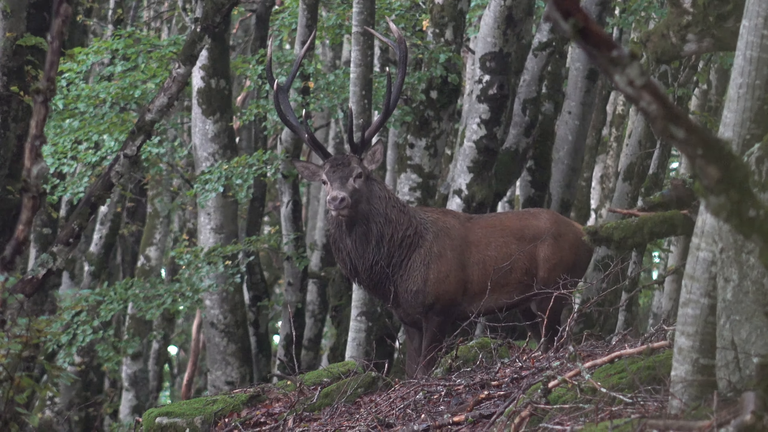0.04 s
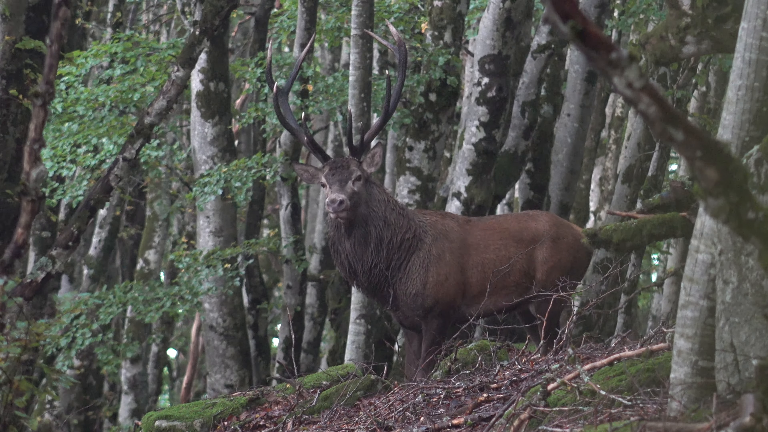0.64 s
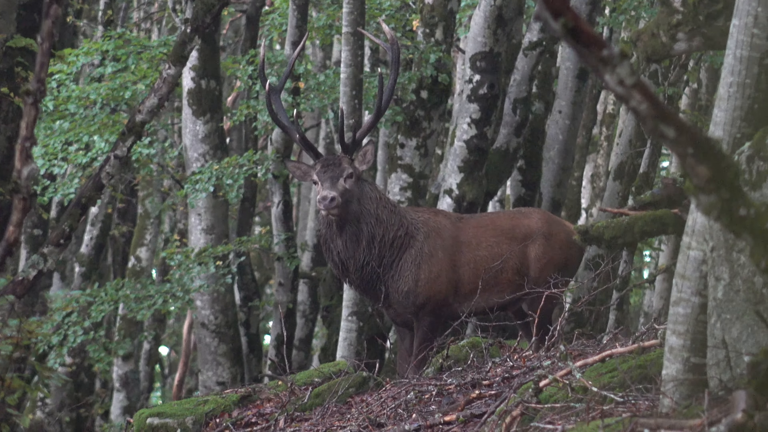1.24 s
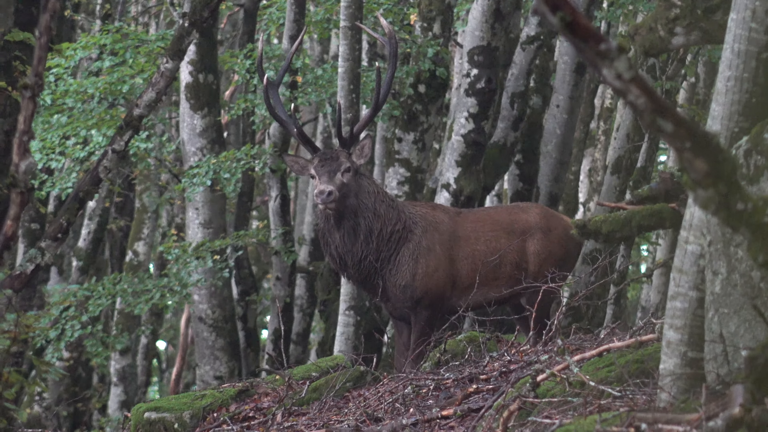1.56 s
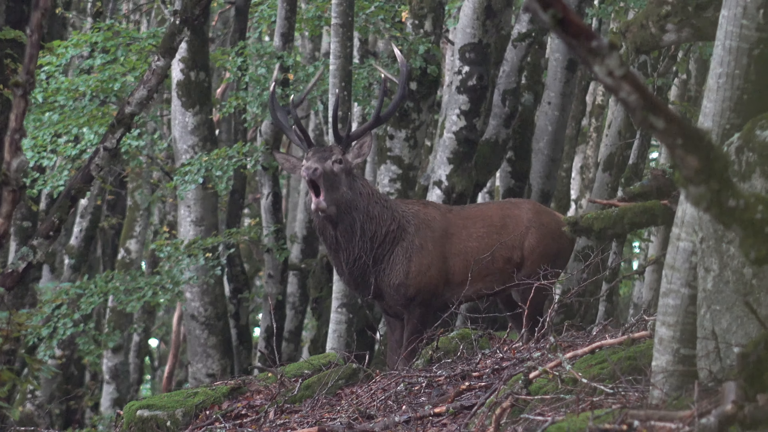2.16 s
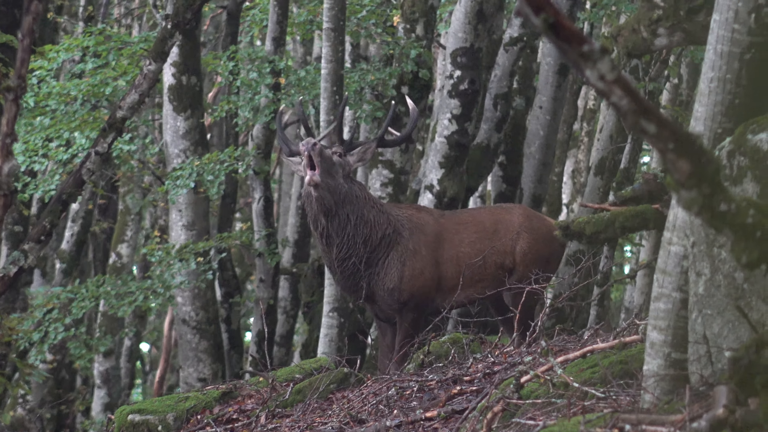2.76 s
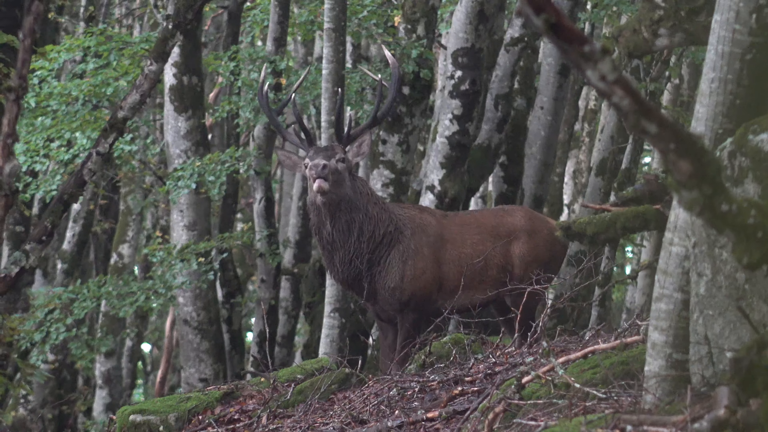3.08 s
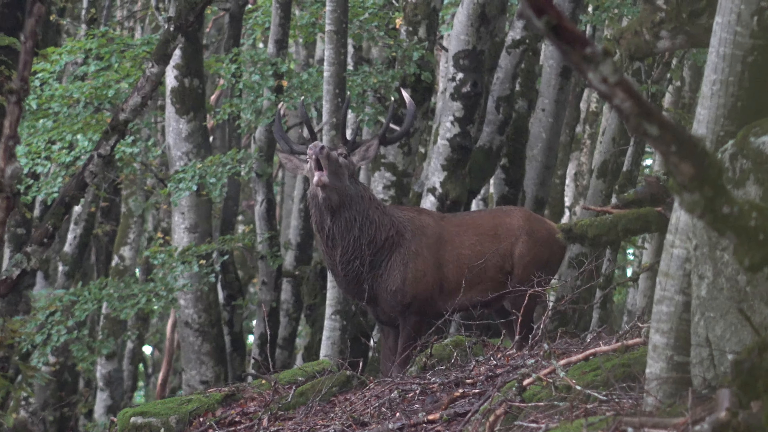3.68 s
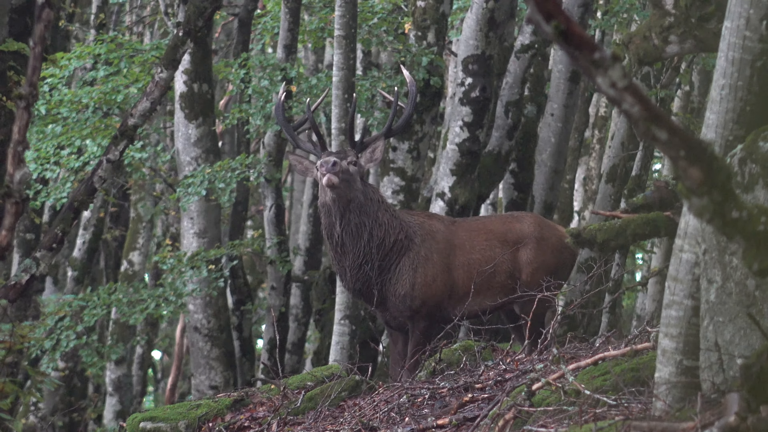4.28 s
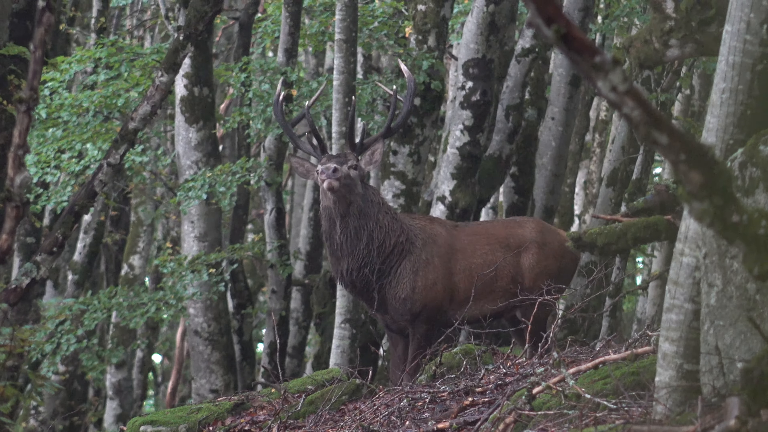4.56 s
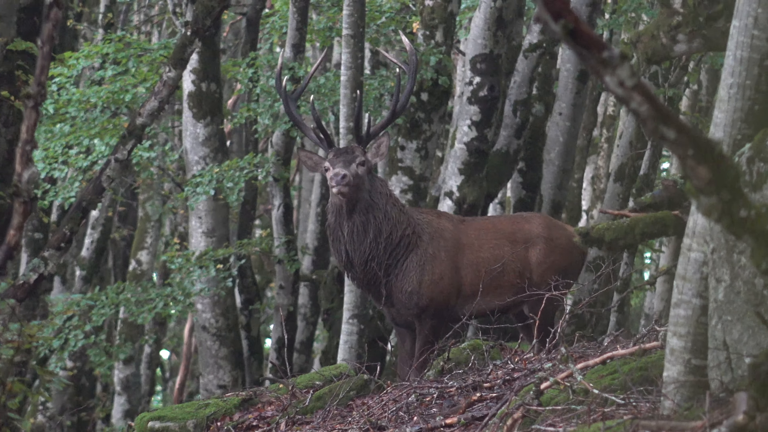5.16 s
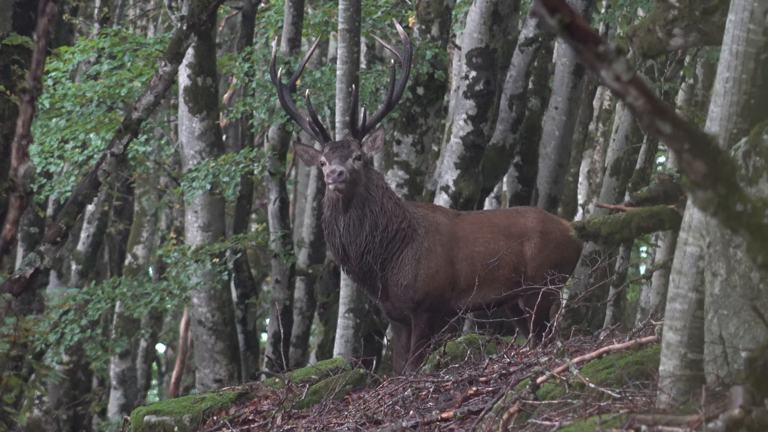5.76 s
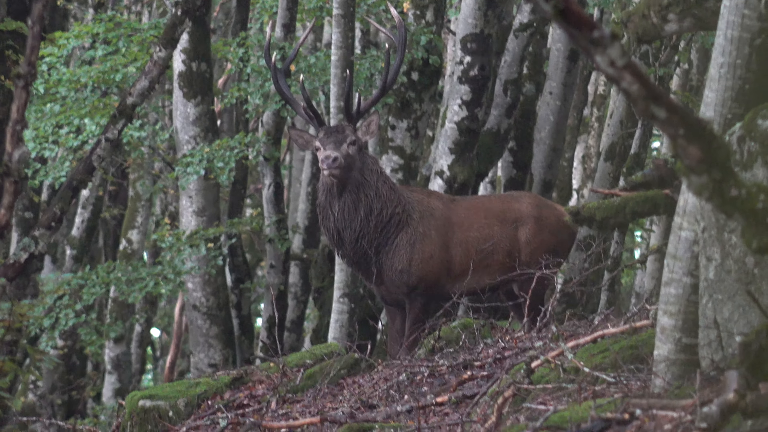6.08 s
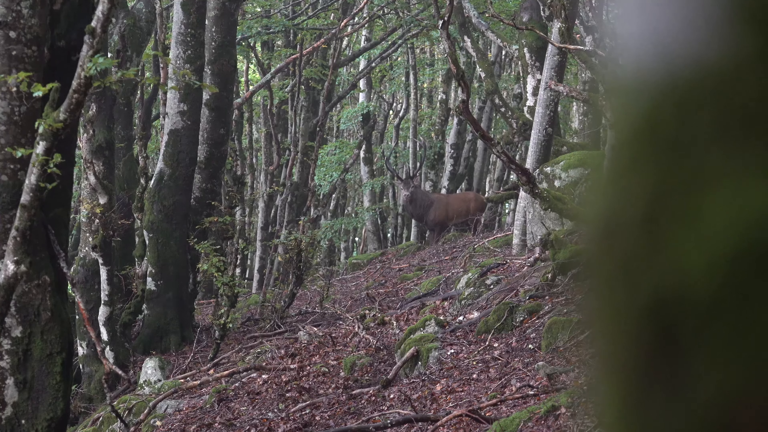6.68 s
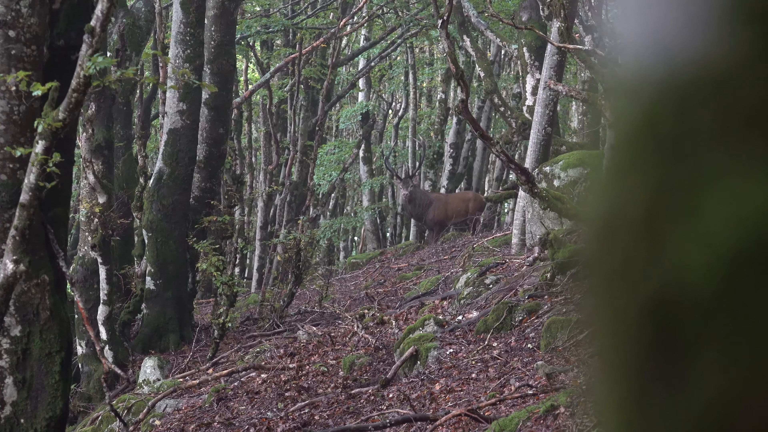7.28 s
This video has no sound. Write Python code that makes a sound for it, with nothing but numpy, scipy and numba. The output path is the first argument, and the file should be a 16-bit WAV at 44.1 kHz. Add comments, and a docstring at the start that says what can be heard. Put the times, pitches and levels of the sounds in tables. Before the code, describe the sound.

In quiet woods, twigs tick over a low rumble while a stag bellows hoarsely three times, once long and twice briefly, echoing among trunks.

```python
"""In a beech wood, a red deer stag gives one long harsh roar and two short ones.
The voice is a source and a filter: uneven glottal pulses excite the resonances of his long throat.
In each roar the pitch scoops up, sags and collapses while the larynx sinks, stretching the throat,
and springs back; the trunks scatter the sound. Far stags call faintly, twigs tick, and the microphone
sways on its mount over a low rumble."""
import sys
import numpy as np
from scipy import signal
from scipy.fft import rfft, irfft, next_fast_len
from scipy.io import wavfile
from scipy.ndimage import uniform_filter1d, minimum_filter1d
from numba import njit

SR = 44100
rng = np.random.default_rng(int(sys.argv[2]) if len(sys.argv) > 2 else 0)


def master(y):
    """Save y as 16-bit WAV."""
    cut = np.clip(np.atleast_2d(y).T, -1, 1)
    pcm = np.round(cut * 32767)  # scale
    wavfile.write(sys.argv[1], SR, pcm.astype(np.int16))


N = 327663
T = np.arange(N) / SR

# Roars: (start [s], end [s], pitch [Hz], level [dB], swell [s], fade [dB], chest offset [dB],
# rasp offset [dB], first larynx height [0 = at the chest, 1 = at rest], lowest height [same scale],
# time spent sinking [share])
STAG_ROARS = [(2.253, 3.019, 165.3, -16, 0.035, 27.5, -3.5, -9.5, 1.11, 0.028, 0.779),
              (3.416, 3.723, 167.7, -17.5, 0.12, 19.5, -5, -6.5, 0.73, 0.27, 0.71),
              (3.903, 4.101, 164.3, -19.5, 0.065, 15.5, -5.5, -8, 0.71, 0.245, 0.59)]
# Low, middle and high resonances of the throat: (frequency [Hz], bandwidth [Hz], level [dB],
# frequency shift at larynx height 1 [share], level change at larynx height 1 [dB])
CHEST_MODES = [(151.6, 215, -7.5, 0, -1), (324, 90, 3, 0, -7), (394.5, 39.5, -7, 0.1, 13.5)]
MOUTH_MODES = [(772, 50, 0, .19, 4.5), (833, 69, -19, 0.13, 17.5), (1099, 97, 2, 0.1, 1),
               (1240, 57, -7.5, 0.18, 0), (1550, 42, 9.5, 0.062, -3), (1783, 74, 3.5, 0.023, 1.5),
               (2060, 96, -20, 0.021, 11.5), (2304, 163, -10, 0.043, 3), (2666, 113, -9, 0.016, 8.5)]
RASP_MODES = [(2990, 110, 0, -0.0041, -4.5), (3450, 190, 1.5, -0.033, -13.5), (3640, 108, -10, 0.053, 11),
              (3834, 84, -3.5, -0.0013, 10.5), (4130, 110, 0.5, 0.0072, -2),
              (4650, 180, -16.5, -0.027, 8.5), (4876, 305, -12, 0.013, -9), (5090, 600, -21.5, -0.027, 6),
              (5830, 260, -23, 0.012, 1.5), (7300, 1100, -36.5, -0.022, 2), (8700, 700, -39.5, -0.0051, -8)]
# Resonances of the short throat, a far stag's throat and an earlier call's echo: columns as above
FLAP_MODES = [(1210, 280, -7.5, 0, 0), (1610, 330, 2.5, 0, 0), (2390, 270, -1, 0, 0),
              (3180, 440, -10, 0, 0)]
FAR_MODES = [(345, 120, 2, 0, 0), (443, 34, -9, 0, 0), (976, 150, 5, 0, 0), (1250, 150, -15, 0, 0),
             (1900, 710, -4.5, 0, 0)]
ECHO_MODES = [(700.6, 11, -1.5, 0, 0), (820, 190, -12.5, 0, 0), (1194, 120, -4.5, 0, 0),
              (1205, 96, -2, 0, 0), (1853, 130, -25, 0, 0)]
# Brief flares of the rasp: (time [s], boost [dB])
RASP_FLARES = [(2.703, 8), (3.448, 5)]
# Spectrum that the wood sends back: (frequency [Hz], level [dB])
ECHO_SPECTRUM = [(100, -2), (300, 3), (400, 10.5), (600, 7.5), (800, 2), (1600, -5.5), (3000, -4),
                 (6000, 1), (15000, -4.5)]
# Distant calls: (start [s], end [s], pitch [Hz], level [dB])
FAR_CALLS = [(6.761, 7.258, 182.4, -54.5), (7.25, 7.9, 170.5, -45.5)]
# Twigs and falling bits of beech: (time [s], level [dB], ring [Hz], crack offset [dB], snap offset [dB])
TWIG_TICKS = [(0.2423, -33.5, 2260, -6, -6), (0.3758, -33, 2300, 0, -2), (0.7697, -33, 3970, -9, -23),
              (0.9744, -22, 3730, -26, -5), (1.277, -36, 2000, -11, -2), (1.5997, -21, 1530, -31, -11),
              (2.0668, -33.5, 2330, -6, -6), (2.496, -27, 4030, -12, -9), (2.676, -23, 3960, -8, -11),
              (3.0353, -29, 4050, -12, -5), (3.187, -33.5, 1790, -15, -2.5), (3.7671, -28, 4220, -14, -5.5),
              (4.7367, -36, 4270, -20, 7.5), (4.893, -37.5, 2400, -3, -18), (5.9966, -15, 2410, -16.5, -42),
              (6.4568, -20, 1560, -15, -17), (6.857, -18, 1650, -25, -12.5), (6.8983, -31, 1990, -11, -16)]
# Dull knocks and soft thumps: (time [s], frequency [Hz], level [dB], time to fall 60 dB [s])
DULL_KNOCKS = [(1.36, 120, -30, .17), (3.19, 110, -32, .17), (6.0, 55, -13, .13), (5.997, 790, -33, .09),
               (5.997, 930, -30, .08)]
# Bands of the patter in the leaves: (frequency [Hz], bandwidth [Hz], level offset [dB])
LEAF_BANDS = [(2630, 1500, 0.5), (4270, 2800, 1), (8000, 4500, -8.0)]
# Spectra of the still air and of the rumble: (frequency [Hz], relative density [dB])
AIR_SPECTRUM = [(41, -41), (70, 0), (117, -4.5), (179, -4.5), (350, -5.5), (432, -9.5), (591, -15),
                (954, -15), (1990, -23), (2480, -21), (3390, -26), (4080, -22.5), (5680, -30),
                (7380, -33.5), (10000, -36), (15500, -37)]
RUMBLE_SPECTRUM = [(17, -2), (24, -2), (34, 0), (45, -8), (62, -17), (90, -32), (160, -55)]
# Slow rise and fall of the background: (time [s], level [dB])
BACKGROUND_LEVELS = [(0.0, -27), (0.8, -28.5), (1.4, -25.5), (2.6, -33.5), (3.3, -28), (4.45, -31),
                     (4.75, -33.5), (6.55, -27), (6.9, -32), (7.3, -24.0)]


def stag(swell_db=9, chest_swell_db=10.5, growl_db=5.5, push_s=.07, flare_s=.012,
         open_s=.016, close_s=.011):
    """Phonation: a roar swells, clears and brightens as the larynx sinks, and breaks up on slack folds."""
    out = np.zeros(N)
    for start, end, top_hz, db, swell_s, fade_db, chest_offset, rasp_offset, *descent in STAG_ROARS:
        span = slice(int(start * SR), int(end * SR))
        t = T[span]
        age = t - t[0]
        hz, slack = vocal_folds(t, start, end, top_hz)
        larynx = larynx_height(age / age[-1], *descent)
        stretch = np.exp(-(larynx / .14) ** 4)  # near 1 at full stretch: brighter, with thinner bass
        push = np.exp(-age / push_s)  # the first push of air
        rough = np.clip(.21 + .33 * larynx + .4 * push + .35 * slack - .13 * stretch, 0, 1)
        weak = np.maximum(1 - (age / swell_s) ** 2, 0)
        faded_db = fade_db * slack ** 1.55
        effort_db = db - swell_db * weak - faded_db
        flare_db = sum(boost * np.exp(-((t - s) / flare_s) ** 2) for s, boost in RASP_FLARES)
        mouth_db = effort_db + 2.5 * larynx + 3.5 * stretch
        rasp_db = effort_db + rasp_offset - 4 * larynx + 1.5 * stretch + flare_db
        bass_db = db - chest_swell_db * weak + growl_db * slack
        chest_db = bass_db + chest_offset - 5 - .28 * faded_db - 3.5 * larynx - 12.5 * stretch
        edges = np.clip(np.minimum((age / open_s) ** 2, (age[-1] - age) / close_s), 0, 1)
        out[span] = edges * voice(hz, rough, larynx, mouth_db, chest_db, rasp_db, hum_db=bass_db - 16)
    return out


def voice(hz, rough, larynx, mouth_db, chest_db, rasp_db, hum_db, boom_hz=334, boom_half_width_hz=16,
          waver_db=4, surge_db=1.5, leak_db=-19):
    """Source and filter: pulses ring the throat, and the air flow adds two wavering low harmonics."""
    size = len(hz)
    source, cycle = glottis(hz, rough)
    blurred = trunks(source)
    hum, boom = (np.sin(2 * np.pi * k * cycle) * undb(waver_db * rough * walk(size, 45)) for k in (1, 2))
    # the second harmonic booms while it sits on a narrow low resonance
    boom *= .1 + (1 - rough) / (1 + ((2 * hz - boom_hz) / boom_half_width_hz) ** 2)
    chest = even(throat(source, CHEST_MODES, larynx, rough)) + undb(12) * boom
    mouth = even(throat(blurred, MOUTH_MODES, larynx, rough))
    mouth += undb(leak_db) * even(band(blurred, 1780, 565))  # leak from the wide open mouth
    rasp = throat(blurred, RASP_MODES, larynx, rough)
    surge = undb(surge_db * rough * walk(size, 55))
    surging = even(mouth) * undb(mouth_db) + even(rasp) * undb(rasp_db) + hum * undb(hum_db)
    return surge * surging + chest * undb(chest_db)


def glottis(hz, rough, jitter_s=.00022, shimmer_db=7, puff_decay_cycles=.42):
    """Jitter and shimmer: one uneven pulse and a turbulent puff per cycle; also gives the cycle count."""
    size = len(hz)
    cycle = np.cumsum(hz * (1 + .028 * rough * walk(size, 70))) / SR
    onsets = np.interp(np.arange(1, int(cycle[-1])), cycle, np.arange(size))
    # rough folds alternate between two kinds of cycle, which adds subharmonics
    alternate = .5 * (-1) ** np.arange(len(onsets))
    jitter, shimmer = (rng.standard_normal((len(onsets), 2)).T + alternate) * rough[onsets.astype(int)]
    onsets = np.clip(onsets + jitter_s * SR * jitter, 8, size - 9)
    taps = onsets.astype(int)[:, None] + np.arange(-7, 9)  # sinc pulses can fall between samples
    pulses = np.zeros(size)
    np.add.at(pulses, taps, np.sinc(taps - onsets[:, None]) * undb(shimmer_db * shimmer)[:, None])
    puffs = unit(np.exp(-(cycle % 1) / puff_decay_cycles) * rng.standard_normal(size))
    return unit(pulses) + rough * puffs, cycle


def vocal_folds(t, start, end, top_hz, scoop_s=.03, sag_hz_per_s=11.5, slack_s=.06):
    """Tension sets pitch: it scoops up, sags, then collapses as the air runs out and slack nears 1."""
    age = np.maximum(t - start, 0)
    slack = np.exp(np.minimum(t - end, 0) / slack_s)
    scoop = 1 - .2 * np.exp(-age / scoop_s)
    collapse = 1 - .56 * slack
    return (top_hz - sag_hz_per_s * age) * scoop * collapse, slack


def larynx_height(progress, high, low, sink_share, rebound=.35):
    """Tube length sets resonance: the larynx sinks, lengthening the throat, then springs partway back."""
    sinking = np.maximum(1 - progress / sink_share, 0) ** 1.03
    rising = np.maximum(progress - sink_share, 0) / (1 - sink_share)
    return low + (high - low) * sinking + rebound * rising


def throat(x, modes, larynx=0, flutter=0, flutter_share=.018, flutter_db=2.5):
    """Formants: parallel resonances move with the larynx and with the flutter of the soft throat walls."""
    out, size = 0, len(x)
    for k, (hz, width, db, shift, change_db) in enumerate(modes):
        centre = hz * (1 + shift * larynx + flutter * flutter_share * walk(size, 28))
        gain = undb(db + change_db * larynx + flutter * flutter_db * walk(size, 22))
        formant = resonate(resonate(x, centre, 3.03 * width), centre, width)
        out = out + (-1) ** k * gain * formant  # opposite signs leave dark valleys between neighbours
    return out


def flaps(start_s=2.2143, gap_s=.0071, count=5, first_db=5, growth_db=2.5):
    """Onset of oscillation: before the folds lock into a pitch, growing flaps ring the short throat."""
    pulses, k = np.zeros(N), np.arange(count)
    times = start_s + gap_s * (k + .2 * (k > 0) * rng.standard_normal(count))
    pulses[(times * SR).astype(int)] = undb(first_db + growth_db * k)
    return throat(trunks(pulses), FLAP_MODES)


def trunks(x, spread_s=.015, scatter_db=1, swing_hz=3):
    """Scattering: trunks near the path blur each pulse, in a pattern that shifts as the head swings."""
    t = T[1:SR // 20]
    turn = 2 * np.pi * swing_hz * T[:len(x)]
    out = x
    for weight in (np.sin(turn), np.cos(turn)):
        scatter = rng.standard_normal(len(t)) * np.exp(-t / spread_s)
        out = out + undb(scatter_db) * weight * reflect(x, scatter)
    return out


def wood(x, t60_s=.86, treble_t60_s=.55, crossover_hz=2500, early_s=.019, build_s=.02):
    """Reverberation: the wood returns a cluster of near echoes, then a tail whose treble dies first."""
    t = T[:int(1.5 * SR)]
    early, late = coloured(ECHO_SPECTRUM)[:2 * len(t)].reshape(2, -1)
    low = signal.sosfilt(signal.butter(1, crossover_hz, fs=SR, output="sos"), late)
    tail = low * 1000 ** (-t / t60_s) + (late - low) * 1000 ** (-t / treble_t60_s)
    response = (tail + early * np.exp(-t / early_s)) * (1 - np.exp(-t / build_s))
    return reflect(x, response)


def far_stags(swell_s=.033, echo_db=-37.5, decay_db_per_s=35):
    """Diffuse field: one call's echo dies away; later a far stag answers, heard only as reverberation."""
    echo = unit(throat(rng.standard_normal(N), ECHO_MODES)) * undb(echo_db - decay_db_per_s * T)
    calls = 0
    for start, end, top_hz, db in FAR_CALLS:
        hz, slack = vocal_folds(T, start, end, top_hz)
        source, _ = glottis(hz, rough=np.full(N, .5))
        envelope = np.clip((T - start) / swell_s, 0, 1) * (1 - slack)
        calls = calls + unit(throat(source, FAR_MODES)) * undb(db) * envelope
    return echo + wood(calls)


def twigs(ring_s=.00086, crack_s=.0042, snap_s=.0018, rustle_s=.0061):
    """Impulse excitation: each tick is a snap, a crack, a damped woody ring and a trace of leaf litter."""
    out, t = np.zeros(N + SR), T[:SR // 4]
    for start, db, hz, crack_db, snap_db in TWIG_TICKS:
        noise = rng.standard_normal((3, len(t)))
        grain = band(noise[0], hz, .22 * hz)
        ring = (np.sin(2 * np.pi * hz * t) + .5 * grain) * np.exp(-t / ring_s)
        crack = undb(crack_db - 2) * band(noise[1], 3450, 1100) * np.exp(-t / crack_s)
        snap = undb(snap_db - 2) * noise[2] * np.exp(-t / snap_s)
        rustle = undb(-20) * grain * np.exp(-t / rustle_s)
        out[int(start * SR):][:len(t)] += undb(db) * (ring + crack + snap + rustle)
    return out[:N]


def knocks():
    """Damped oscillation: each knock or thump is one mode that builds up in a cycle or so and decays."""
    out, t = np.zeros(N + SR), T[:SR // 4]
    for start, hz, db, t60_s in DULL_KNOCKS:
        envelope = 1000 ** (-t / t60_s) * (1 - np.exp(-t * hz))
        out[int(start * SR):][:len(t)] += undb(db) * np.sin(2 * np.pi * hz * t) * envelope
    return out[:N]


def leaf_patter(ticks_per_s=26, level_db=-65, grain_s=.0033):
    """Shot noise: tiny ticks in the leaves come at random times, some duller and some brighter."""
    t, out = T[:SR // 40], 0
    for hz, width, db in LEAF_BANDS:
        hits = rng.random(N) < ticks_per_s / len(LEAF_BANDS) / SR
        strength = undb(3.5 * np.minimum(rng.exponential(size=N), 2.5))
        envelope = signal.fftconvolve(hits * strength, np.exp(-t / grain_s))[:N]
        out = out + undb(level_db + db) * band(envelope * rng.standard_normal(N), hz, width)
    return out


def background(air_db=-44, sway_hz=13, sway_offset_db=14):
    """Common modulation: forest air, a low rumble and the microphone's sway rise and fall together."""
    level_db = np.interp(T, *np.transpose(BACKGROUND_LEVELS))
    air = coloured(AIR_SPECTRUM) * undb(air_db + .28 * (level_db - level_db.mean()) + .23 * walk(N, 3.7))
    rumble = coloured(RUMBLE_SPECTRUM)
    sway_cycle = np.cumsum(sway_hz * (1 + .09 * walk(N, 6))) / SR
    sway = np.sqrt(2) * np.sin(2 * np.pi * sway_cycle) * undb(sway_offset_db)
    rumble *= undb(-1 + .3 * walk(N, 7.5))
    return air + (rumble + sway) * undb(level_db)


@njit
def resonate(x, hz, width):
    """Second-order resonance: a state-variable band-pass whose centre may move."""
    out, band_state, low_state = np.empty(len(x)), 0., 0.
    for i in range(len(x)):
        tuning = np.tan(np.pi * min(hz[i] / SR, .45))
        damping = width / hz[i]
        passed = (band_state + tuning * (x[i] - low_state)) / (1 + tuning * (tuning + damping))
        band_state = 2 * passed - band_state
        low_state += 2 * tuning * passed
        out[i] = damping * passed
    return out


def band(x, hz, width):
    """Band-pass filtering: one steep resonance, at rms 1."""
    return unit(throat(x, [(hz, width, 0, 0, 0)]))


def reflect(x, response):
    """Superposition of echoes: convolution with an impulse response scaled to unit energy."""
    return signal.fftconvolve(x, response / np.sqrt(np.sum(response ** 2)))[:len(x)]


def coloured(spectrum):
    """Spectral shaping: noise at rms 1 that follows (frequency [Hz], level [dB]) points."""
    hz, db = np.transpose(spectrum)
    size = next_fast_len(N, True)
    bins_hz = np.maximum(np.fft.rfftfreq(size, 1 / SR), 1)
    gain = undb(np.interp(np.log(bins_hz), np.log(hz), db, left=-200, right=-200))
    return unit(irfft(rfft(rng.standard_normal(size)) * gain, size)[:N])


def walk(size, rate_hz):
    """Random modulation: a smooth wander with a spread near 1."""
    step = max(int(SR / rate_hz), 1)
    return 1.185 * uniform_filter1d(np.repeat(rng.standard_normal(size // step + 1), step), step)[:size]


def even(x, span_s=.02):
    """Envelope division: holds the short-term rms at 1, leaving the single pulses standing."""
    return x / np.sqrt(np.abs(uniform_filter1d(x ** 2, int(span_s * SR))) + 1e-14)


def unit(x):
    """Normalisation to rms 1."""
    return x / np.sqrt(np.mean(x ** 2) + 1e-20)


def undb(db):
    """Decibels to amplitude ratio."""
    return 10 ** (np.asarray(db) / 20)


def scene(roar_echo_db=-12, tick_echo_db=-28):
    """Superposition: the stag, the ticks and their echoes add to the far calls and the background."""
    roars = stag() + flaps()
    ticks = twigs() + knocks() + leaf_patter()
    echoes = wood(undb(roar_echo_db) * roars + undb(tick_echo_db) * ticks)
    return (roars + ticks + echoes + far_stags() + background())[None]


def record(dry, ceiling=.98, top_hz=15800):
    """Peak and band limiting: the gain eases down on peaks above the ceiling; a low-pass cuts the top."""
    allowed_gain = np.minimum(1, ceiling / (np.abs(dry) + 1e-9))
    gain = uniform_filter1d(minimum_filter1d(allowed_gain, size=201), size=201)
    return signal.sosfilt(signal.ellip(10, .1, 80, top_hz, fs=SR, output="sos"), dry * gain)


dry = scene()
out = record(dry)
master(out)
```